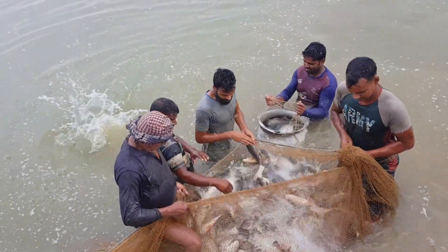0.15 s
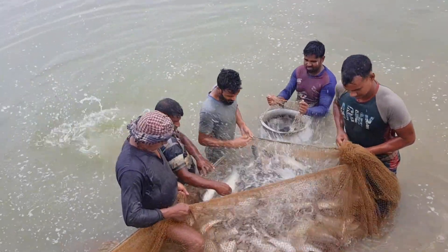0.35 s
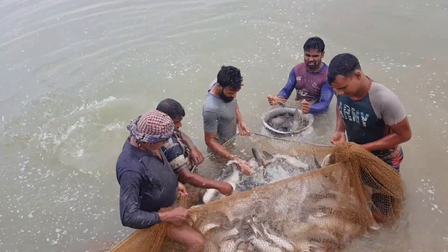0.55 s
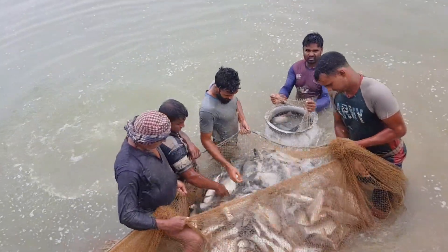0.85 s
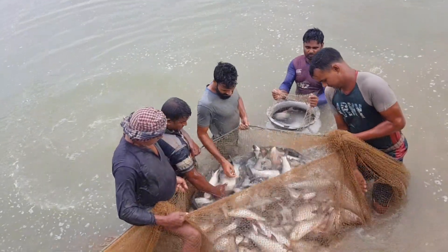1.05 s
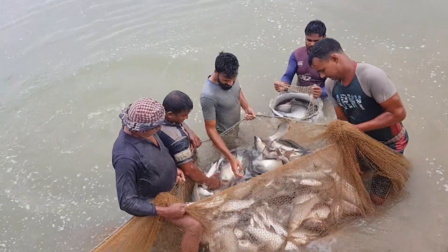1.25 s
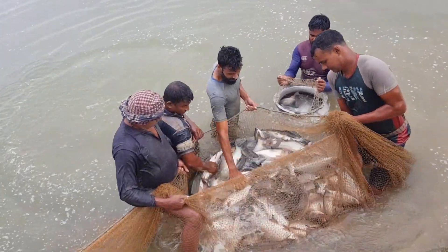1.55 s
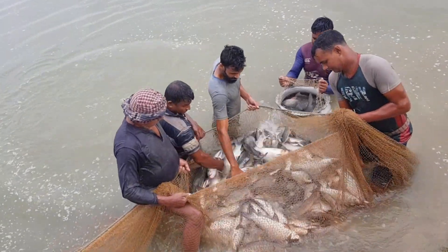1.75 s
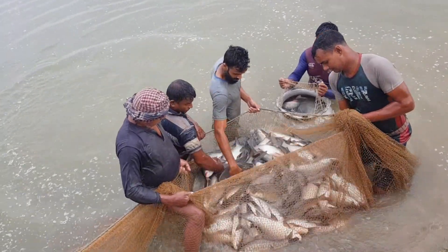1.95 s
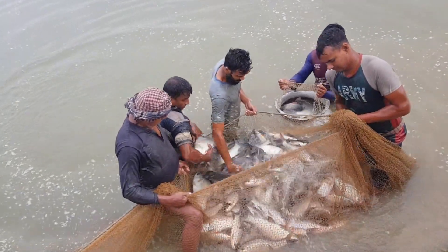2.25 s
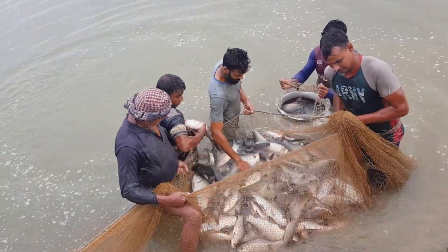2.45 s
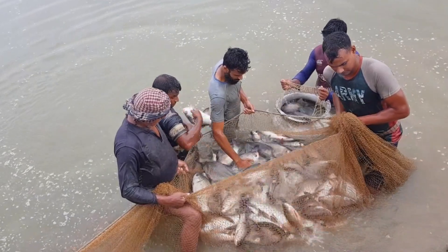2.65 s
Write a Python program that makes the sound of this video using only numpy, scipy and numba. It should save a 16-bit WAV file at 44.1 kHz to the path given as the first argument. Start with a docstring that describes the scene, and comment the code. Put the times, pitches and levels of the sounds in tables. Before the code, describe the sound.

Fish splash and flap in a net a few metres away in an open pond. Quick wet slaps, spray and low gulps start busy, thin out, then return in bursts, while a light breeze gives the microphone dull thumps.

```python
"""Wet slaps and splashes: a netful of fish thrashes in shallow pond water, a few metres away in the open air.
Tails smack the surface and throw spray, trapped air gulps, and flung drops patter down.
Underneath, the whole catch keeps the water churning. Every bubble and drop is a damped sine that rises
in pitch as it fades. A light breeze buffets the left microphone of a hand-held recorder,
and a few dull low thumps sound like wind bumping it."""
import sys
import numpy as np
from scipy import signal
from scipy.fft import rfft, irfft, next_fast_len
from scipy.io import wavfile
from scipy.ndimage import uniform_filter1d
from numba import njit

SR = 44100
rng = np.random.default_rng(int(sys.argv[2]) if len(sys.argv) > 2 else 0)


def output_pcm(signal):
    """Save a mono or channel-first signal as 16-bit PCM at the path in sys.argv[1].

    Samples are clipped to [-1, 1] before scaling.
    """
    pcm = np.clip(np.atleast_2d(signal).T, -1, 1) * 32767
    wavfile.write(sys.argv[1], SR, np.round(pcm).astype(np.int16))


N = 123479
T = np.arange(N) / SR

# tail slaps on the surface (time [s], level [dB], pitch of the air pocket [Hz])
TAIL_SLAPS = [(0.07, -3.5, 1240), (.143, 1.5, 2320), (.179, 6.5, 1390), (0.188, -16, 1240),
              (0.213, -2, 1900), (0.231, -4, 1600), (0.281, -2.5, 1300), (.412, -1, 1450),
              (0.553, -10, 2370), (0.632, -5.5, 1470), (0.685, -1, 1580), (0.712, -10, 2750),
              (0.763, -9, 1620), (.803, 0, 2300), (.939, -6.5, 1780), (1.087, 1, 1500), (1.218, -5.5, 1900),
              (1.234, 0.5, 1480), (1.32, -7, 1170), (1.422, -4.5, 2230), (1.615, -4.5, 1540),
              (1.716, -2, 2570), (1.86, -13.5, 2220), (1.982, -5, 3330), (2.014, -2, 1410),
              (2.029, 0, 2180), (2.106, 1.5, 2270), (2.133, -8, 1520), (2.142, -2, 1370),
              (2.198, -1.5, 1730), (2.462, -8.5, 1400), (2.51, -7, 1560), (2.556, -7, 1720),
              (2.653, 1, 2930), (2.719, 2, 1490), (2.761, -2.5, 1740)]
# tone of fine spray (frequency [Hz], gain [dB])
SPRAY_TONE = [(700, -12), (3500, 7.5), (5500, -2.5), (7500, -6.5), (9500, 0), (11500, 4), (13000, 3),
              (14500, -4.5), (16000, -3)]
FLAP_S = 0.055  # mean time between the small flaps of the catch


def undb(db):
    """Decibels to gain."""
    return 10 ** (np.asarray(db) / 20)


def steady(x, size=SR // 10):
    """Ride the level to hold rms 1 over windows of `size` samples."""
    return x / np.sqrt(uniform_filter1d(np.mean(x ** 2, axis=0), size=size))


def colour(x, points, share=1):
    """Minimum-phase EQ through (frequency [Hz], gain [dB]) points; `share` scales the decibels."""
    size = 2 * next_fast_len(N)
    hz, db = np.array(points, float).T
    bin_hz = np.maximum(np.arange(size // 2 + 1) * SR / size, 1)
    gain = undb(np.interp(np.log(bin_hz), np.log(hz), db))
    cepstrum = irfft(share * np.log(gain))
    cepstrum[1:size // 2] *= 2
    cepstrum[size // 2 + 1:] = 0
    return irfft(rfft(x, size) * np.exp(rfft(cepstrum)))[..., :N]


@njit
def ring(start, hz, cycles, gain, glide):
    """Damped sines that swell within a cycle, decay over `cycles` and rise by `glide` per decay time."""
    out = np.zeros(N)
    for k in range(len(start)):
        life = cycles[k] / hz[k]
        for i in range(max(0, int(start[k] * SR) + 1), min(N, int((start[k] + 6 * life) * SR))):
            age = i / SR - start[k]
            turns = hz[k] * age * (1 + glide * age / life / 2)
            envelope = np.exp(-age / life) * (1 - np.exp(-2.5 * turns))
            out[i] += gain[k] * envelope * np.sin(2 * np.pi * turns)
    return out


def bubbles(start, hz, cycles, gain, glide=0.031):
    """Bubbles and drops, each reaching the two microphones from its own direction."""
    left_lead_s = 0.00004 + 0.00007 * rng.standard_normal(len(start))
    cycles = np.full(len(hz), cycles)
    return np.array([ring(start - side * left_lead_s / 2, hz, cycles, gain, glide) for side in (1, -1)])


def swarm(flaps, low_hz, high_hz, cycles, spread_db, flap_db, count):
    """A crowd of bubbles, many soft and a few loud, strongest just after each flap."""
    when, pitch, length, loudness, sign = rng.random((count, 5)).T
    start = when * N / SR
    hz = low_hz + (high_hz - low_hz) * pitch
    ring_cycles = cycles * undb(16 * (length - 0.5))
    since_flap = start - flaps[np.searchsorted(flaps, start) - 1]
    db = -spread_db * np.log(np.maximum(loudness, 0.02)) + flap_db * np.exp(-2 * since_flap / FLAP_S)
    gain = np.sign(sign - 0.5) * undb(db) * np.sqrt(hz / ring_cycles)  # short rings keep their energy
    return bubbles(start, hz, ring_cycles, gain)


def shower(times, db, low_hz, high_hz, cycles, decay_s, count):
    """A shower of small bubbles or drops that swells around each given time and dies away."""
    swell = 0.1705  # build-up, as a share of the decay time
    jitter, pitch, sign = rng.random((len(times) * count, 3)).T
    slot = np.arange(len(jitter)) % count
    late = -np.log(1 - (slot + jitter) / count)  # in decay times: dense at first, then thinning
    start = np.repeat(times, count) + decay_s * (late - swell)
    hz = low_hz * (high_hz / low_hz) ** pitch
    envelope = np.exp(-late / 2) * (1 - np.exp(-late / swell))
    return bubbles(start, hz, cycles, np.repeat(undb(db), count) * np.sign(sign - 0.5) * envelope)


def breeze():
    """Low eddies rumble at both microphone ports; the puffs catch only the left one."""
    # bell-shaped puffs of wind (time of the crest [s], level [dB], half width [s])
    puffs = [(0.087, -22.5, 0.012), (0.233, -17.5, 0.011), (0.226, -27, 0.045), (0.627, -36.5, 0.071),
             (0.781, -29, 0.015), (1.203, -29.5, 0.076), (1.827, -24, 0.037), (2.014, -25, 0.012),
             (2.116, -25, 0.02)]
    band = signal.butter(2, [40, 111.5], "band", fs=SR, output="sos")
    eddies = signal.sosfilt(band, rng.standard_normal((2, 1, N)))
    left, right = (steady(port, size=SR // 25)[0] for port in eddies)
    buffeting = sum(undb(db) * np.exp(-((T - s) / half) ** 2 / 2) for s, db, half in puffs)
    calm = undb(-46)
    return np.array([left * (buffeting + calm), right * calm])


def churn():
    """Tail slaps and small uneven flaps of the catch stir up a bed of gurgle, splash and fine spray."""
    # fader moves of the churning water (time [s], gurgle [dB], splash [dB], spray [dB])
    faders = [(0.0, -29, -20.5, -35), (0.05, -36, -23.5, -32.5), (0.17, -24.5, -15.5, -25),
              (0.27, -27, -22.5, -31), (0.43, -26.5, -18, -30.5), (0.481, -26, -24.5, -31),
              (0.528, -22.5, -19, -28.5), (0.6, -34, -26, -31.5), (0.67, -31, -22.5, -34),
              (0.78, -32.5, -23.5, -29.5), (0.88, -31.5, -24.5, -32), (0.959, -44, -26.5, -36.5),
              (1.11, -33.5, -27, -37.5), (1.17, -41, -29.5, -40.5), (1.241, -40, -23, -37),
              (1.295, -33.5, -32.5, -41), (1.332, -27, -22, -35.5), (1.45, -28.5, -24, -33.5),
              (1.53, -37, -30, -39), (1.67, -45, -29.5, -38), (1.751, -38.5, -30, -36.5),
              (1.8, -72, -36, -44.5), (1.956, -54, -37.5, -44.5), (2.013, -26, -22.5, -31),
              (2.14, -29, -20, -28.5), (2.261, -42, -30, -37.5), (2.43, -43, -28, -35.5),
              (2.57, -33, -28.5, -42), (2.642, -28, -21.5, -32.0), (2.8, -36, -28.5, -30.5)]
    # tone of the low bubbles (frequency [Hz], gain [dB])
    gurgle_tone = [(80, 5), (160, -3.5), (300, -4.5), (480, -5.5), (800, 1.5), (1100, -9.5)]
    # tone of the splashing (frequency [Hz], gain [dB])
    splash_tone = [(350, -24.5), (700, -24), (880, -10.5), (1080, -2), (1320, 3.5), (1900, 1.5),
                   (2450, 1.5), (3500, -4), (5200, -11.5), (7500, -21.5)]
    times, gurgle_db, splash_db, spray_db = np.array(faders).T
    beats = np.arange(-1, 200)
    small_flaps = (beats + rng.random(len(beats))) * FLAP_S
    flaps = np.union1d(small_flaps, np.array(TAIL_SLAPS)[:, 0])
    gurgle = swarm(flaps, low_hz=130, high_hz=1163, cycles=1.28, spread_db=2, flap_db=7.5, count=1900)
    splash = swarm(flaps, low_hz=602, high_hz=6660, cycles=6.2, spread_db=1.5, flap_db=5.5, count=9000)
    spray = swarm(flaps, low_hz=3780, high_hz=14100, cycles=0.49, spread_db=1, flap_db=7.5, count=24000)
    layers = [(gurgle, gurgle_tone, gurgle_db + 1.5),
              (splash, splash_tone, splash_db - 2.5),
              (spray, SPRAY_TONE, spray_db + 1.5)]
    return sum(steady(colour(x, tone)) * undb(np.interp(T, times, db)) for x, tone, db in layers)


def patters():
    """Handfuls of fine flung drops land together in a bright spatter."""
    # drops landing on the water (time [s], level [dB])
    landings = [(.686, -5), (0.745, -9), (0.768, -13), (0.855, -8.5), (0.878, -9), (1.715, -11),
                (1.982, -14), (2.03, -2.5), (2.317, -11.5), (2.654, -8)]
    times, db = np.array(landings).T
    drops = shower(times, db - 5.5, low_hz=3190, high_hz=15900, cycles=1.26, decay_s=0.0036, count=90)
    return colour(drops, SPRAY_TONE)


def gulps_and_thumps(ring_s=0.0048, glide=0.025, trail_s=0.028, trail_count=4):
    """Low gulps of trapped air, plus a few dull low thumps like wind bumping the microphone."""
    # gulps and thumps; the four lowest are the thumps (time [s], level [dB], pitch [Hz])
    low_hits = [(.221, -5, 278), (0.239, -8.5, 197), (.526, -8.5, 341), (.631, -10.5, 440), (.657, -7, 223),
                (.687, -10.5, 491), (.772, -15, 756), (0.939, -22.5, 388), (1.204, -7, 108),
                (1.307, -19, 257), (1.411, -12, 373), (1.457, -9, 448), (1.498, -14, 370), (1.695, -11, 84),
                (1.813, -21, 148), (1.861, -22.5, 185), (1.972, -15, 209), (2.166, -10, 314),
                (2.169, -7, 818), (2.521, -16, 943), (2.591, -6, 305), (2.621, -3.5, 272)]
    times, db, hz = np.array(low_hits).T
    cycles = hz * ring_s
    out = bubbles(times, hz, cycles, undb(db), glide)
    for k in range(trail_count):  # softer rings trail each hit, most of them higher
        jitter, octaves = rng.random((len(times), 2)).T
        start = times + trail_s * (k + jitter) / trail_count
        out += bubbles(start, 0.87 * hz * 2 ** octaves, cycles, undb(db - 13), glide)
    return out


def slaps():
    """A tail cracks on the water, an air pocket rings briefly, then splinters of water follow."""
    times, db, hz = np.array(TAIL_SLAPS).T
    pocket = bubbles(times, hz, cycles=1.47, gain=undb(db - 2))
    crack = shower(times, db - 14, low_hz=1400, high_hz=5200, cycles=0.3, decay_s=0.00102, count=8)
    splinters = shower(times, db - 14.5, low_hz=1095, high_hz=3240, cycles=4.4, decay_s=0.0067, count=16)
    return pocket + crack + splinters


def surroundings(x, echo_db=-13, decay_s=0.008):
    """Short, sparse reflections scatter back from nearby bodies and the water surface."""
    age = T[:SR // 5]
    echoes = rng.standard_normal((2, len(age))) ** 3 * np.exp(-age / decay_s)  # cubing makes it sparse
    echoes /= np.sqrt(np.sum(echoes ** 2, axis=1, keepdims=True))
    return x + undb(echo_db) * signal.fftconvolve(x, echoes, axes=1)[:, :N]


def scene():
    """The water and the thumps, coloured differently at each microphone, plus the breeze."""
    # shape of the stereo balance (frequency [Hz], lean to the left [dB])
    balance = [(300, 0.5), (800, 2), (1400, -0.5), (2300, -7.5), (3900, 1), (5500, 4), (8200, 13.5),
               (10500, 11.5), (12500, 6.5), (15500, 3.5)]
    left, right = surroundings(churn() + slaps() + gulps_and_thumps() + patters())
    mix = np.array([colour(left, balance, share=0.44), colour(right, balance, share=-0.67)])
    return mix + breeze()


def record(dry, top_hz=15900):
    """The recorder rounds the highest peaks and cuts the top."""
    lowpass = signal.ellip(10, 0.2, 80, top_hz, fs=SR, output="sos")
    return signal.sosfilt(lowpass, np.tanh(dry))


dry = scene()
out = record(dry)
output_pcm(out)
```